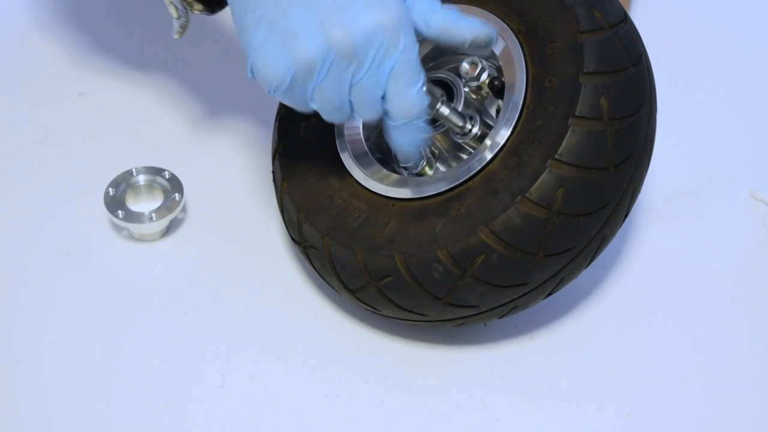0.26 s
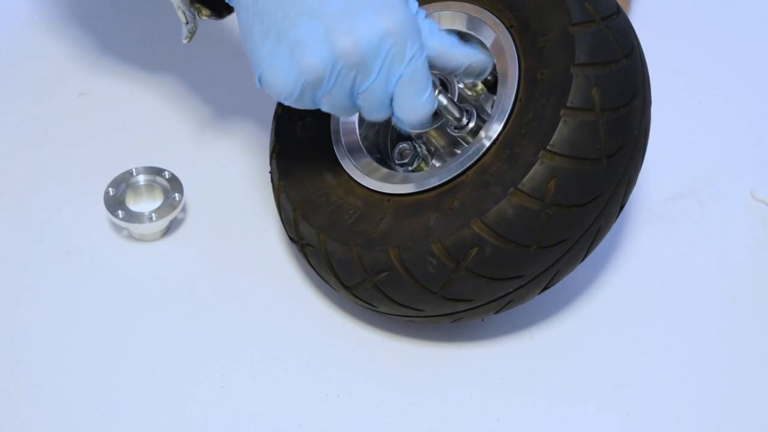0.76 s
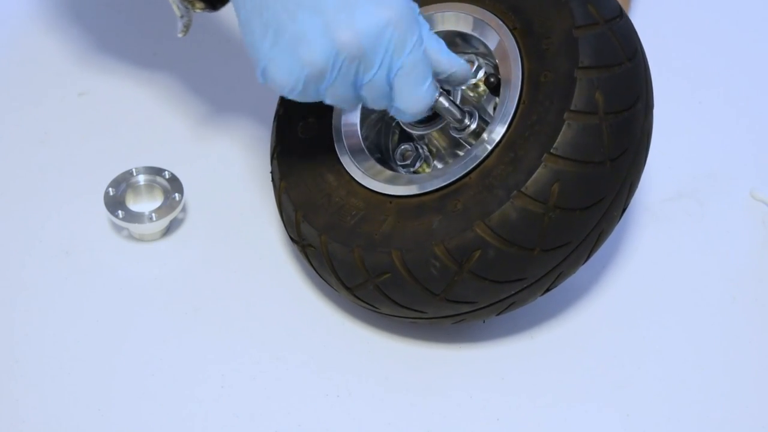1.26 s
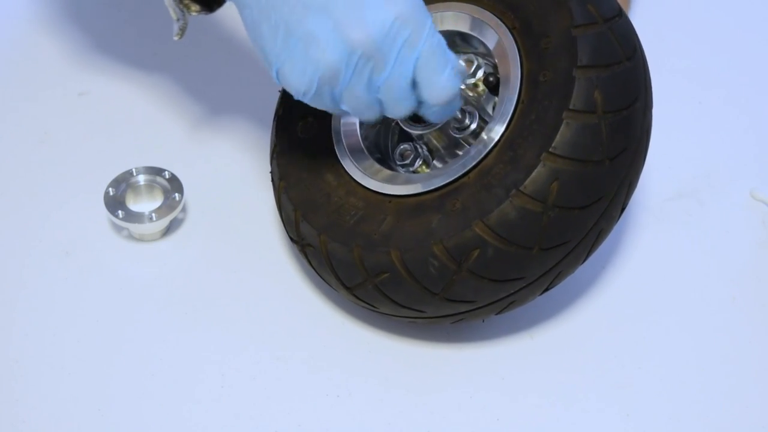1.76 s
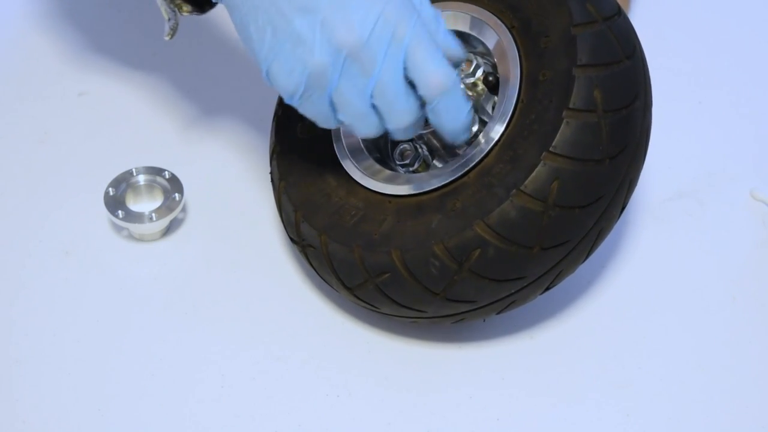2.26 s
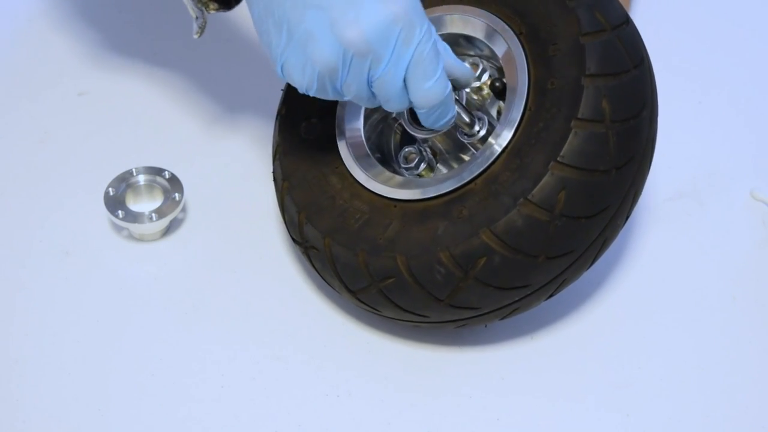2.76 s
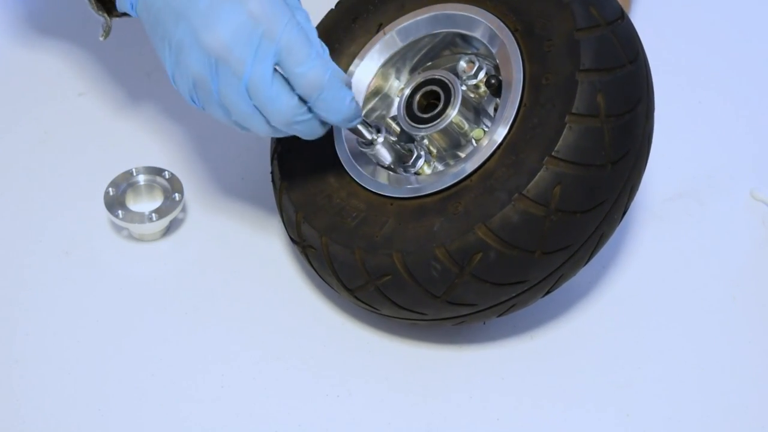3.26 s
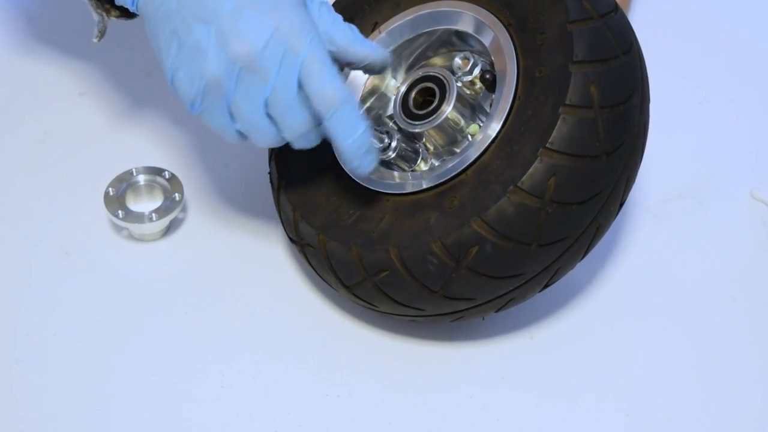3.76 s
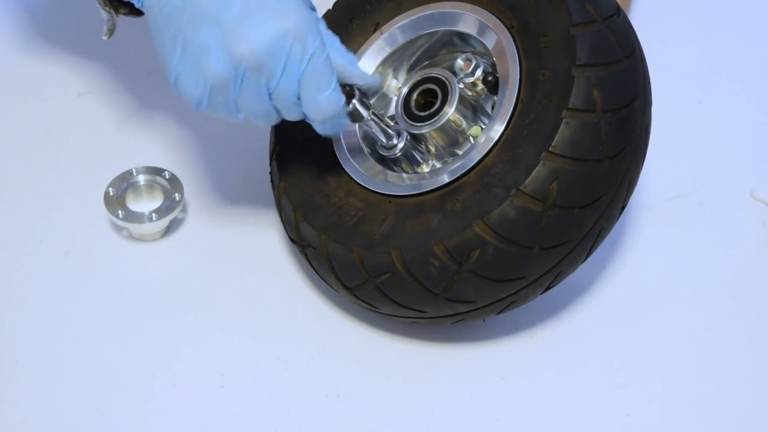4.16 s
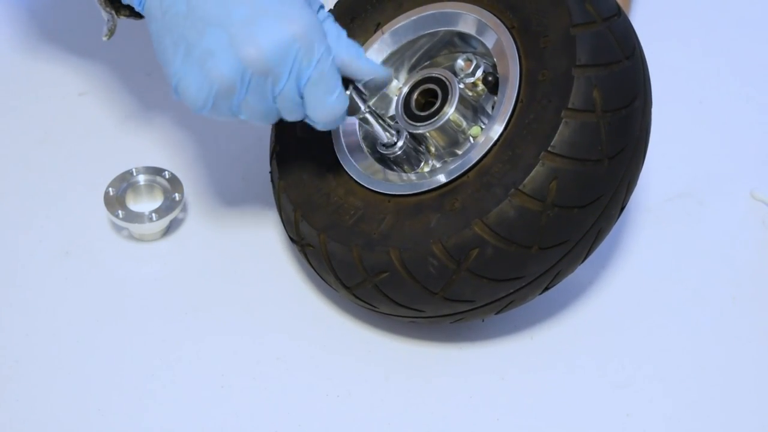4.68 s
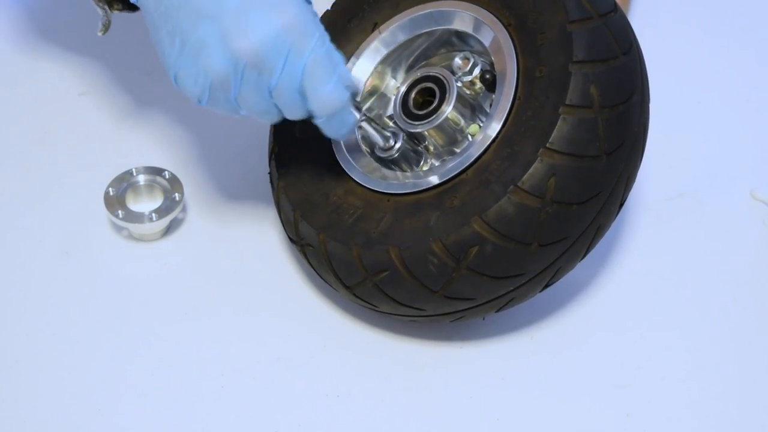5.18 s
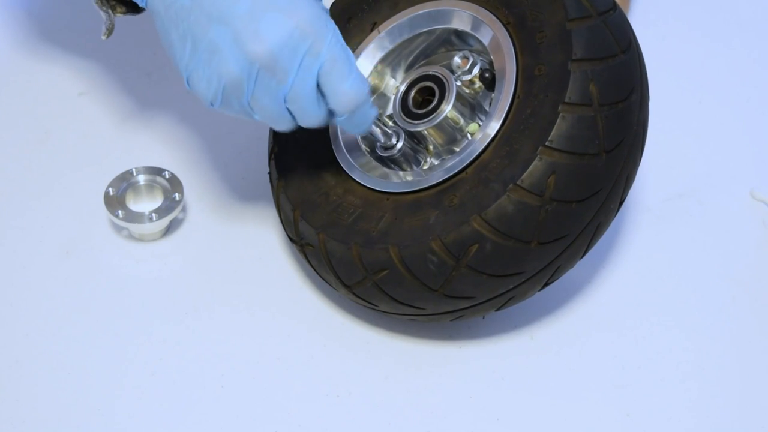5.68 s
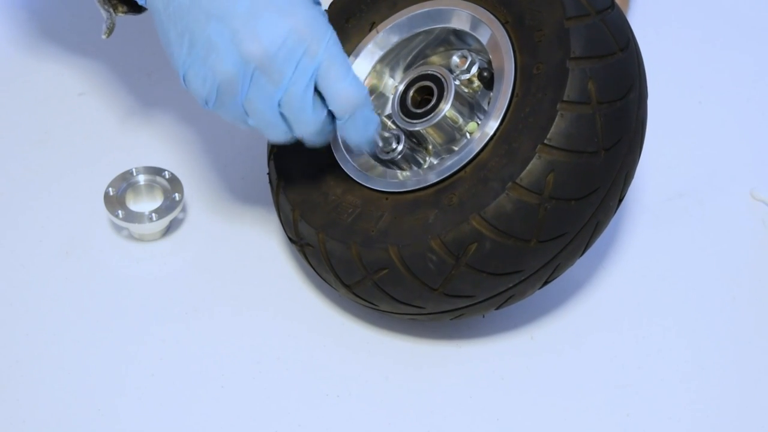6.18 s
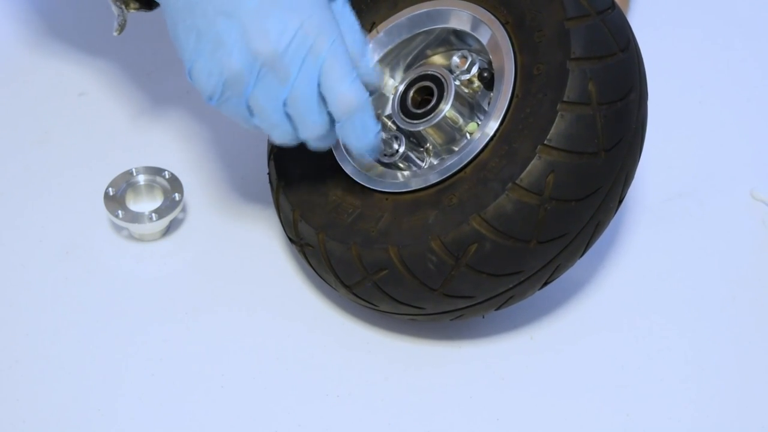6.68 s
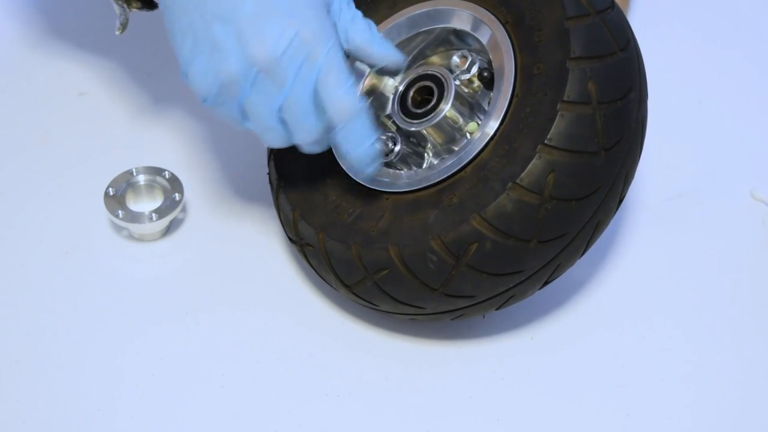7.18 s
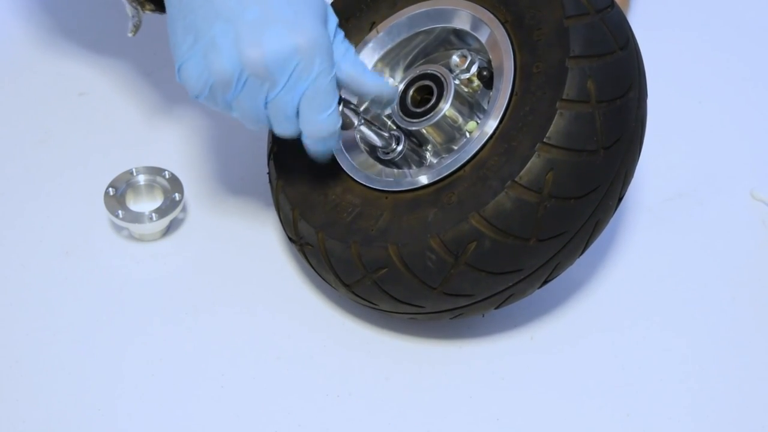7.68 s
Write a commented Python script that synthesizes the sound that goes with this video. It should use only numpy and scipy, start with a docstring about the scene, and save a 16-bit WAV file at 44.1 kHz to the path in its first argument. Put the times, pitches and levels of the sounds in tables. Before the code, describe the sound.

A steady, hollow fan whirr with a very thin whine sits mostly at the right under faint hiss, in a hard room with a short bright reverb. Slightly left and close, a small steel nut is flicked down a stud: light clicks and scratchy thread rattles from 0.1 s, clustering at 0.7 s, 1.3 s and 1.8 s, with dull, quickly damped tyre bumps. The heaviest double bump and knock come near 2.1 s. Clicks continue to 2.7 s, then thin out; a tick at 3.0 s and a sharp bright clack at 3.2-3.3 s mark the change to another nut. From 3.6 s ticks are smaller, with a firmer knock at 4.5 s. From 4.9 s brief dry squeaks join, clearest near 6.0 s, above soft low rumbling. Snappy clicks at 6.3 s, denser knocks from 7.0 s, a thin high ring at 7.26 s, and final knocks near 7.9 s.

```python
"""Under faint hiss and the whirr of a fan inside the camera, filtered noise ringing its case mostly at the right,
a gloved hand spins small steel nuts down the studs of a little alloy wheel on a table in a hard room.
Each finger flick excites damped modes: nut, hub and rim knock, the thread rattles, the tyre bumps the table.
From about 4.9 s the second nut also squeaks on its thread by stick-slip, as the stud resonates."""
import sys
import numpy as np
from scipy import signal
from scipy.fft import rfft, irfft, next_fast_len
from scipy.io import wavfile

SR = 44100
rng = np.random.default_rng(int(sys.argv[2]) if len(sys.argv) > 2 else 0)


def gain_from_db(level_db):
    """Convert decibel levels to linear amplitude factors (20 dB per decade)."""
    decades = np.asarray(level_db, float) / 20
    return 10 ** decades


def int16_out(signal):
    """Quantize to a 16-bit WAV file."""
    q = np.round(np.clip(np.atleast_2d(signal).T, -1, 1) * 32767)
    wavfile.write(sys.argv[1], SR, q.astype(np.int16))


N = 350154
T = np.arange(N) / SR
EARLY_S = .006  # near echoes fill this time, the diffuse tail follows

# broad, well damped resonances of the metal parts: (frequency [Hz], width [Hz], relative level [dB])
RIM_MODES = [(1240, 1800, 7), (2230, 340, 8), (2750, 1660, 6), (3220, 1600, -12)]
HUB_MODES = [(4500, 2500, 3.5), (5130, 330, 2.5), (5840, 1100, 3), (6530, 1060, -3)]
NUT_MODES = [(8200, 2200, 0), (10400, 2200, -1), (12000, 1400, -2), (14000, 2600, -8)]
# pushes of the fingers on the nut: (start [s], held [s], thread rattle level [dB],
# brightness relative to the rattle [dB], tyre creak level [dB])
FINGER_PUSHES = [(0.075, 0.13, -60, -7, -50.5), (0.33, 0.056, -61.5, -9, -56.5),
                 (0.43, 0.015, -52, -9, -46), (0.654, 0.03, -53.5, -7, -52), (0.684, 0.02, -62, -9, -44.5),
                 (0.72, 0.036, -57, -19, -47), (0.84, 0.059, -60, -17, -56),
                 (0.952, 0.074, -59.5, -12, -50), (1.202, 0.063, -56, -6.5, -50),
                 (1.493, 0.09, -57.5, -6, -50), (1.739, 0.091, -50.5, -10, -50.5),
                 (1.85, 0.015, -52, -17, -49.5), (2.051, 0.05, -47.5, -17, -41.5),
                 (2.32, 0.075, -69, -12, -48), (2.458, 0.092, -68, -22, -54.5),
                 (2.551, 0.14, -60, -25, -50), (2.67, 0.017, -71, -25, -56),
                 (3.229, 0.079, -44.5, -49, -48), (3.42, 0.094, -63, -20, -57),
                 (3.599, 0.025, -56.5, -7, -55.5), (3.88, 0.056, -60.5, -14, -53),
                 (4.079, 0.017, -60, -12, -51.5), (4.15, 0.049, -52.5, -10.5, -49),
                 (4.339, .08, -53, -15, -50), (4.447, 0.01, -46, -14, -44.5),
                 (4.55, 0.14, -56.5, -10.5, -51), (4.82, 0.12, -61.5, -14, -52.5),
                 (5.168, 0.055, -46.5, -16, -46.5), (5.433, .01, -49, -5.5, -43.5),
                 (5.444, 0.017, -59, -12, -52), (5.696, 0.15, -51.5, -13.5, -49.5),
                 (5.954, 0.087, -55, -8.5, -51), (6.184, 0.061, -54.5, -12, -49.5),
                 (6.31, 0.016, -52.5, -10, -50.5), (6.46, .1, -53, -10.5, -48.5),
                 (6.639, 0.13, -58, -14, -48.5), (6.779, 0.018, -54.5, -16, -69),
                 (6.953, 0.0036, -50, -15, -56), (6.973, 0.053, -55, -27, -48),
                 (7.088, 0.0079, -48.5, -7, -43), (7.22, 0.076, -48, -12, -48),
                 (7.508, 0.028, -48.5, -13, -50.5), (7.863, .1, -44.5, -18, -45.5)]


def on_log(hz, table):
    """Interpolation on a log frequency axis: reads a (frequency [Hz], value) table."""
    f, v = np.transpose(table)
    return np.interp(np.log(np.maximum(hz, 1)), np.log(f), v)


def colour(x, gain):
    """Linear filtering: multiplies the spectrum by a gain that is a function of Hz."""
    n = next_fast_len(x.shape[-1])
    hz = np.arange(n // 2 + 1) * SR / n
    return irfft(rfft(x, n) * gain(hz), n)[..., :x.shape[-1]]


def resonances(table):
    """Modal superposition: power sum of steep peaks, each 7.5 dB down at the edges of its width."""
    def gain(f):
        peaks = (gain_from_db(db) ** 2 / (1 + (2 * (f - hz) / width) ** 2) ** 2.5 for hz, width, db in table)
        return np.sqrt(sum(peaks))
    return gain


def level(x, db):
    """Mean power: scales a signal to an rms level."""
    return x * gain_from_db(db) / np.sqrt(np.mean(x ** 2))


def peak_one(grains):
    """Normalisation: scales every row to peak 1."""
    return grains / np.abs(grains).max(axis=1, keepdims=True)


def place(times, grains):
    """Superposition in time: adds grains (events x samples) at their starts."""
    out = np.zeros(N + grains.shape[1])
    for s, grain in zip(times, grains):
        i = min(int(s * SR), N)
        out[i:i + len(grain)] += grain
    return out[:N]


def thin_bass(x):
    """High-pass filtering: thins the bass of clicks and pings, 12 dB per octave below 1300 Hz."""
    return colour(x, lambda f: np.clip(f / 1300, 0, 1) ** 2)


def tones(table, attack_s, spread, size):
    """Damped free vibration: clusters of three close modes from rows (s, dB, Hz, t60)."""
    s, db, hz, t60 = np.transpose(table)[:, :, None]
    t = np.arange(size) / SR
    shape = (1 - np.exp(-t / attack_s)) * np.exp(-np.log(1000) * t / t60)
    cluster = sum(np.sin(2 * np.pi * hz * (1 + k * spread) * t) for k in (-1, 0, 1))
    return place(s[:, 0], gain_from_db(db) * peak_one(shape * cluster))


def ticks(per_s, spread_db):
    """Shot noise: random impulses, mostly faint, some stronger; rms 1."""
    chance = rng.random((N, 2))
    excess = np.minimum(-np.log(1 - chance[:, 1]), 4)
    size = gain_from_db(spread_db * excess) * rng.choice([-1, 1], N)
    return level((chance[:, 0] < per_s / SR) * size, 0)


def blows(contact_ms, size=1024):
    """Impact excitation: per row a sharp tick, then grit that swells and dies over the contact time."""
    grit_db = -5
    ms = (np.arange(size) - 88) * 1000 / SR  # the tick falls 2 ms into the row
    grit = gain_from_db(grit_db) * rng.standard_normal((len(contact_ms), size))
    swell = np.clip(ms / contact_ms[:, None], 0, 1)
    decay = np.exp(-np.maximum(ms, 0) / np.clip(contact_ms, .1, 6)[:, None])
    return (ms == 0) + grit * swell * decay


def pushes(rows, db, fall_db_per_s, rest_db):
    """Friction under load: level in dB that swells with each push, holds, and dies to its resting level."""
    rise_s = 0.00066
    power = gain_from_db(rest_db) ** 2
    for (s, held_s, *_), peak_db in zip(rows, db):
        rise = np.clip((T - s) / rise_s, 0, 1)
        fall_db = fall_db_per_s * np.maximum(T - s - held_s, 0)
        power = power + (rise * gain_from_db(peak_db - fall_db)) ** 2
    return 10 * np.log10(power)


def air():
    """Broadband noise: faint hiss of room and microphones, its bass coherent on both sides."""
    # hiss spectrum: (frequency [Hz], relative density [dB])
    hiss_spectrum = [(25, 27.5), (60, 12), (120, -6), (300, -10.5), (1000, 4), (3000, -5.5), (5000, -9.5),
                     (8000, -16.5), (12000, -21), (16000, -33)]
    shared, left, right = rng.standard_normal((3, N))
    apart = colour(np.array([left, right]), lambda f: np.clip(f / 300, 0, 2))
    return level(colour(shared + apart, lambda f: gain_from_db(on_log(f, hiss_spectrum))), -51.5)


def camera_fan():
    """Forced resonance: air rush rings the camera case, and the motor adds one thin tone at the right."""
    # case resonances heard at each microphone: (frequency [Hz], width [Hz], relative level [dB])
    case_right = [(250, 48, -21), (568, 66, -7), (655, 340, -9), (986.6, 83, 4.5), (1180, 110, 5),
                  (1309, 106, 1.5), (1510, 600, -7.5), (1734, 152, 2.5), (1657, 26, 2), (1942, 113, -3.5),
                  (2513, 200, -10.5), (3005, 58, -21)]
    case_left = [(490, 490, -5), (920, 200, -23.5), (976, 220, 12.5), (1130, 250, -7), (1645, 190, 9),
                 (2180, 200, 4), (2080, 100, -24), (3060, 180, 2)]
    right_db, left_db, likeness = -38, -51.5, 0.59
    whine_hz, whine_db = 2136, -63
    rush, other = rng.standard_normal((2, N))
    left_rush = likeness * rush + np.sqrt(1 - likeness ** 2) * other
    left = level(colour(left_rush, resonances(case_left)), left_db)
    right = level(colour(rush, resonances(case_right)), right_db)
    whine = np.sqrt(2) * gain_from_db(whine_db) * np.sin(2 * np.pi * whine_hz * T)
    return np.array([left, right + whine])


def room():
    """Diffuse reverberation: a two-sided noise tail whose bands decay exponentially, each at its own rate."""
    # reverberation time: (frequency [Hz], t60 [s])
    reverberation = [(200, 0.088), (1000, 0.21), (3000, 0.36), (6000, 0.37), (12000, 0.29), (16000, 0.17)]
    # coherence: (frequency [Hz], share of power common to both sides [0 to 1])
    coherence = [(100, 0.91), (500, 0.52), (2500, 0.97), (6000, 0.87), (12000, 0.29)]
    room_db = 1
    t = np.arange(SR // 2) / SR
    shared, left, right = rng.standard_normal((3, len(t)))
    tail = 0
    for hz in 100 * 2 ** np.arange(0, 8, .5):
        like = on_log(hz, coherence)
        noise = np.sqrt(like) * shared + np.sqrt(1 - like) * np.array([left, right])
        # triangular band, half an octave to either side
        band = colour(noise, lambda f: np.clip(1 - 2 * np.abs(np.log2(np.maximum(f, 1) / hz)), 0, 1))
        tail = tail + band * (t >= EARLY_S) * np.exp(-np.log(1000) * t / on_log(hz, reverberation))
    return gain_from_db(room_db) * tail / np.sqrt(np.sum(tail ** 2) / 2)


def blended_room(x):
    """Diffuse reverberation: a smooth tail blended in turn from four random responses."""
    step_s = .23
    turn = T / step_s
    wet = 0
    for k in range(4):
        share = np.clip(1 - np.abs((turn - k + 2) % 4 - 2), 0, 1)
        wet = wet + signal.oaconvolve((np.sqrt(share) * x)[None], room(), axes=1)[:, :N]
    return wet


def table_rumble():
    """Low resonance under load: the table rumbles as the hand leans on the wheel, harder for the second nut."""
    # lean of the hand: (time [s], rumble level [dB])
    lean = [(0, -71), (0.7, -77), (1.3, -72), (1.9, -85), (2.5, -69), (3.0, -80), (3.4, -71), (4.4, -65),
            (5.1, -66.5), (5.8, -62.5), (6.7, -67), (7.5, -65.5), (7.94, -80)]
    grumble = colour(ticks(per_s=160, spread_db=4), resonances([(144, 350, 0)]))
    return gain_from_db(np.interp(T, *np.transpose(lean))) * level(grumble, 0)


def wheel_rocks():
    """Rigid-body rocking: the wheel rocks on the table in low damped modes."""
    # rocks: (time [s], peak level [dB], middle pitch [Hz])
    rock_rows = [(1.14, -55, 175), (2.049, -53, 242), (2.096, -40, 304), (2.139, -47, 274),
                 (3.232, -46, 143), (3.785, -50, 142), (4.297, -42, 130), (4.456, -54, 154),
                 (4.548, -46, 165), (4.764, -49, 117), (5.054, -47, 185), (5.173, -49, 163),
                 (5.586, -45, 138), (5.708, -47, 177), (6.317, -52, 168), (6.648, -47, 150),
                 (7.187, -47.5, 131), (7.388, -48, 135), (7.49, -52, 177)]
    return tones([(*row, .05) for row in rock_rows], attack_s=0.0022, spread=0.17, size=9000)


def tyre_bumps():
    """Heavily damped impact: the tyre bumps the table and its widely spaced modes die in 30 ms."""
    # bumps: (time [s], peak level [dB], middle pitch [Hz])
    bump_rows = [(0.445, -39.5, 543), (0.663, -35, 690), (0.727, -30, 567), (0.844, -37, 390),
                 (1.141, -37, 533), (1.216, -31.5, 510), (1.538, -35, 545), (1.581, -32, 540),
                 (1.734, -36, 544), (1.857, -33, 500), (2.059, -32, 460), (2.097, -24.5, 505),
                 (2.104, -24, 410), (2.118, -33, 320), (2.131, -30, 500), (2.162, -34, 560),
                 (2.325, -35, 545), (2.352, -32, 483), (2.561, -31, 550), (2.591, -33, 634),
                 (4.17, -45, 426), (4.458, -32, 540), (4.536, -38, 514), (5.175, -35, 560),
                 (5.714, -38, 500), (5.971, -39.5, 537), (6.323, -33, 640), (6.686, -55, 516),
                 (6.974, -32.5, 540), (7.19, -34, 486), (7.36, -31, 505), (7.615, -38.5, 504),
                 (7.87, -35, 615)]
    return tones([(*row, .03) for row in bump_rows], attack_s=.002, spread=.14, size=4000)


def tyre_creak():
    """Friction noise: rubber creaks through the tyre's resonances under each push."""
    # tyre resonances: (frequency [Hz], width [Hz], relative level [dB])
    tyre_modes = [(340, 280, -9.5), (496.4, 157, 5.5), (741, 275, 2.5), (1400, 1140, -4)]
    creak_db = np.transpose(FINGER_PUSHES)[4]
    swell_db = pushes(FINGER_PUSHES, creak_db, fall_db_per_s=96, rest_db=-63)
    return gain_from_db(swell_db) * level(colour(ticks(per_s=900, spread_db=3.2), resonances(tyre_modes)), 0)


def squeaks():
    """Stick-slip: fast slips of the second nut on its thread ring the stud."""
    # squeaks: (start [s], held [s], level [dB])
    squeak_rows = [(4.92, 0.03, -60), (6.015, 0.016, -44), (6.279, 0.03, -57), (6.5, 0.023, -53),
                   (6.79, 0.03, -55), (7.062, 0.05, -50), (7.27, 0.031, -55), (7.57, 0.021, -49)]
    # stud resonance: (frequency [Hz], width [Hz], relative level [dB])
    stud_mode = [(5030, 380, 0)]
    db = pushes(squeak_rows, np.transpose(squeak_rows)[2], fall_db_per_s=400, rest_db=-95)
    return gain_from_db(db) * level(colour(ticks(per_s=720, spread_db=2.0), resonances(stud_mode)), 0)


def taps(rattle_db, count):
    """Random impacts: faint taps as strong as the thread rattles just then; rows like the knocks."""
    over_rattle_db, spread_db = 12, 4
    shares_db = (-14.5, -14, -20)  # rim, hub, nut
    s = rng.random(count) * N / SR
    chance = spread_db * rng.standard_normal((count, 4))
    tap_db = np.interp(s, T, rattle_db) + over_rattle_db + chance[:, 0]
    return np.column_stack([s + 0.0018, tap_db, shares_db + chance[:, 1:]])


def thread_rattle():
    """Chatter in a clearance: thread play rings the metal under each push; also returns faint tap rows."""
    fall_db_per_s = 159
    rest_db, rest_bright_db = -88, -29  # fingers resting on the nut
    _, _, rattle_db, bright_db, _ = np.transpose(FINGER_PUSHES)
    dull_db = pushes(FINGER_PUSHES, rattle_db, fall_db_per_s, rest_db)
    sharp_db = pushes(FINGER_PUSHES, rattle_db + bright_db, fall_db_per_s, rest_db + rest_bright_db)
    chatter = ticks(per_s=1300, spread_db=4)
    dull = gain_from_db(dull_db) * level(colour(chatter, resonances(RIM_MODES + HUB_MODES)), 0)
    sharp = gain_from_db(sharp_db) * level(colour(chatter, resonances(NUT_MODES)), 0)
    return dull + sharp, taps(dull_db, count=45)


def metal_pings():
    """Damped modes: short pitched colour of the knocks, and a few longer nut rings."""
    # pings: (time [s], peak level before the bass loss [dB], middle pitch [Hz], t60 [s])
    ping_rows = [(0.7035, -18.5, 3050, 0.004), (0.739, -32, 2670, 0.004), (1.787, -16.5, 2680, 0.0037),
                 (1.858, -30.5, 5260, 0.008), (1.862, -32, 6200, 0.008), (1.876, -31, 5600, 0.012),
                 (2.454, -40, 13700, .012), (2.454, -41, 8800, .01), (3.005, -29, 5700, 0.0074),
                 (3.0052, -24.5, 6170, 0.0041), (3.005, -36, 13300, 0.0054), (3.231, -20, 5700, 0.0089),
                 (3.2315, -17, 4330, .005), (3.232, -17.5, 3180, .005), (3.231, -50, 14300, .04),
                 (3.231, -51, 10800, .02), (3.425, -35, 5130, 0.011), (4.147, -40.5, 8500, 0.0091),
                 (5.78, -31, 5100, .008), (5.968, -34.5, 11800, .03), (6.02, -35, 12070, .02),
                 (7.255, -24, 10800, 0.004), (7.272, -33, 10600, .005), (7.257, -25, 11900, 0.19),
                 (7.2575, -26, 5400, 0.01), (7.2548, -20.5, 2750, 0.0045), (7.2575, -29, 2270, 0.0066)]
    return thin_bass(tones(ping_rows, attack_s=.0005, spread=.004, size=9000))


def snaps():
    """Short contact, wide spectrum: some knocks also snap in the top treble."""
    # snaps: (time [s], peak level [dB])
    snap_rows = [(3.3334, -48), (3.3388, -31), (3.481, -42), (6.32, -20), (6.3244, -30), (6.7101, -49),
                 (7.0933, -38), (7.5128, -39)]
    # treble band: (frequency [Hz], width [Hz], relative level [dB])
    snap_band = [(14300, 5000, 0)]
    contact_ms = .7
    s, db = np.transpose(snap_rows)
    bursts = colour(blows(np.full(len(s), contact_ms)), resonances(snap_band))
    return place(s - .002, gain_from_db(db)[:, None] * peak_one(bursts))


def ring_parts(contact, shares):
    """Modal excitation: one blow sounds through rim, hub and nut, each in its own share."""
    parts = 0
    for modes, share_db in zip((RIM_MODES, HUB_MODES, NUT_MODES), shares):
        parts = parts + gain_from_db(share_db)[:, None] * peak_one(colour(contact, resonances(modes)))
    return thin_bass(parts)


def near_echoes(s, clicks):
    """Early reflections: table, tyre, rim and hand throw each click back at once, in a new random pattern."""
    early_db, likeness = 4, 0.81  # likeness: share of power common to both sides
    table_echo_s, table_echo_db = .0046, -11.5  # one distinct reflection
    size = int(EARLY_S * SR)
    shared, left, right = rng.standard_normal((3, len(s), size)) / np.sqrt(size)
    table_echo = np.eye(1, size, int(table_echo_s * SR)) * gain_from_db(table_echo_db)
    near = []
    for own in (left, right):
        echo = gain_from_db(early_db) * (np.sqrt(likeness) * shared + np.sqrt(1 - likeness) * own)
        near.append(place(s - .002, signal.fftconvolve(clicks, echo + table_echo, axes=1)))
    return np.array(near)


def knocks(faint):
    """Impact of nut on stud and hub: returns the clicks, smooth clicks for the reverb, and near echoes."""
    # clear knocks: (time [s], peak level [dB], rim share [dB], hub share [dB], nut share [dB]);
    # the shares count only relative to one another
    knock_rows = [(0.0758, -33, -11.5, -23, -13), (0.1652, -29, -9, -20, -12.5),
                  (0.2032, -30, -9.5, -13, -15), (0.3324, -37, -10, -16, -10), (0.377, -36, 31, -29, -15),
                  (0.4412, -24, 0, -20, -10.5), (0.6719, -37, -4, -17, -27), (0.685, -28.5, -9, -8, 1),
                  (0.704, -19, -8, -8, -38), (0.731, -21, -15, -22, -2), (0.7395, -19.5, -7, -16, -35),
                  (0.767, -31, -19, -4, -13), (0.9687, -39, -3, -19, -4), (0.9905, -34, 9, -14, -19),
                  (1.007, -25, 0, -9, -7), (1.2096, -31.5, -6, -15, -4), (1.2581, -25.5, 6, -21, -9),
                  (1.277, -15, -8.5, -22, -23.5), (1.3468, -26.5, 1, -14, -24),
                  (1.504, -26.5, -3, -12, -19), (1.5441, -24.5, 1, -20, -13),
                  (1.5644, -25.5, -9.5, -16, -9), (1.732, -19, 11, -14, -4), (1.7651, -28, -15, -19, -15),
                  (1.787, -22, -6, -30, -27), (1.8555, -18, -8, -12, -12), (1.9734, -37.5, -20, -10, -19),
                  (2.0563, -22, -13, -11, -8.5), (2.0998, -18.5, -8.5, -12.5, -8),
                  (2.2226, -31.5, 7, -31, -23), (2.3265, -30, 6, -34, -37), (2.4, -38, -10, -24, -7),
                  (2.4545, -19, -4, -12, -24.5), (2.549, -27, -3, -18, -27), (2.588, -30.5, 8, -28, -36),
                  (2.6354, -31.5, 4, -18, -10), (2.672, -32, 6, -25, -18), (2.679, -26, 1, -15, -20),
                  (2.685, -33, 1, -9, -20), (2.955, -38, -5, -8, -31), (3.005, -19, -20, -20, -28),
                  (3.2316, -18, -7, 0, -22), (3.2345, -19, -10, -4, -28), (3.253, -27, -10, -4, -32),
                  (3.29, -28, -8, -4, -32), (3.3347, -20.5, -14.5, -13, -9), (3.4251, -31, -12, -11, -14),
                  (3.441, -32, -13, -14, -12), (3.4823, -28, -8, -15, -11.5), (3.61, -35.5, -4, -4, -6),
                  (3.6304, -33, -17, -9, -8), (3.8784, -33, 1, -3, 2), (4.063, -36, -2.5, -11, -12),
                  (4.146, -38.5, -32, -11, -21), (4.2567, -33, 1, -9, -3), (4.3538, -35.5, -10, -19, -13.5),
                  (4.3813, -35, -17, -12, -18), (4.459, -20.5, -16, -15, -14), (4.5501, -25, -25, -20, -7),
                  (4.6354, -27, -14, -11, -19), (4.672, -32.5, -11.5, -3, -11), (4.795, -37, -7, -12, -11),
                  (4.821, -37, -10, -13, -13), (4.886, -34.5, 1, -4, -12), (4.917, -39, -16, -8, -14.5),
                  (5.009, -33.5, -10, -16, -21), (5.045, -35.5, -11, -2, -4),
                  (5.167, -24.5, -8.5, -8, -11.5), (5.171, -28, -15, -10, 13), (5.175, -27.5, -7, -4, -2),
                  (5.2794, -31.5, 9, -14, -14), (5.2954, -31, -29, -3, -8), (5.446, -28, -36, -11, -9),
                  (5.5895, -33.5, -7, -14, -16.5), (5.7095, -24.5, -8.5, -7, -12.5),
                  (5.736, -47, -20, -22, -8), (5.77, -26, -6, -8, -12), (5.7803, -27, -7, -2, -1),
                  (5.815, -32, -14, -10, -6), (5.86, -41, -14, -13, -4), (5.89, -36, -26, -16, -9),
                  (5.9683, -28.5, -18, -4, -8), (6.022, -26, -11, -12, -16), (6.037, -29, -12, -5, -17),
                  (6.045, -32, -14, -8, -17), (6.151, -37.5, -8, -18, -9), (6.198, -42, -14, -10, 1),
                  (6.2255, -32.5, -15, -14, -13), (6.295, -30, -9, -2, -8), (6.321, -22, -11.5, -17, -11),
                  (6.3255, -29.5, -10, -16, -5), (6.334, -29, -16, -12, -6), (6.4316, -36, -14, -9, -12),
                  (6.4978, -38, -16, 0, -13), (6.642, -32, 5.5, -14, -2), (6.688, -44, -12, -10, -12),
                  (6.7099, -34.5, -18, -8, -11), (6.735, -33.5, -6, -6, -19),
                  (6.797, -32.5, -15, -6, -16.5), (6.815, -34, -12, -9, -12), (6.875, -46, -6, -12, -12),
                  (6.975, -24.5, -8, -19, -16), (7.003, -28, -7, -29, -20), (7.0626, -24, -7, -10, -22),
                  (7.0936, -21, -11, -10, -9), (7.11, -28, -14, -10, -14), (7.2265, -25.5, 2, -9, -3),
                  (7.2548, -21, -17.5, -14, -19), (7.2578, -20, -1.5, -13, -9.5),
                  (7.3818, -31, 3, -19, -11), (7.4826, -34, 1, 0, -1), (7.5148, -20.5, -12.5, -23, -13.5),
                  (7.5797, -24.5, -16, -14, -19.5), (7.6126, -28.5, -3.5, -34, -4.5),
                  (7.829, -40, -6, -1, -5), (7.871, -19, -13, -17.5, -14), (7.927, -19.5, -18, -7, -8)]
    s, db, *shares = np.transpose([*knock_rows, *faint])
    # the more the rim outweighs the nut, the shorter the contact
    contact_ms = 1.14 * gain_from_db(np.minimum(shares[2] - shares[0], 0))
    contact = blows(contact_ms)
    clicks = gain_from_db(db)[:, None] * peak_one(ring_parts(contact, shares))
    # the reverb is fed a smooth click, free of grit, of equal energy
    impulses = np.eye(1, contact.shape[1], 88).repeat(len(s), axis=0)
    smooth = ring_parts(impulses, shares)
    smooth = smooth * np.sqrt(np.sum(clicks ** 2, axis=1) / np.sum(smooth ** 2, axis=1))[:, None]
    return place(s - .002, clicks), place(s - .002, smooth), near_echoes(s, clicks)


def scene():
    """Superposition of direct and reverberant sound: the wheel, a little to the left, over fan and air."""
    # side balance: (frequency [Hz], left minus right [dB])
    left_lead = [(100, -2), (500, 2), (1500, 10), (2800, 5.5), (5500, 4), (10000, 5.5), (15000, 0.5)]
    ping_room_db, bump_room_db = -5, -5  # pings and bumps sound drier than the knocks
    rattle, faint = thread_rattle()
    clicks, smooth, near = knocks(faint)
    pings = metal_pings()
    bumps = tyre_bumps() + squeaks()
    wheel = wheel_rocks() + rattle + tyre_creak() + table_rumble() + snaps()
    to_room = smooth + gain_from_db(bump_room_db) * bumps + gain_from_db(ping_room_db) * pings + wheel
    wet = near + clicks + pings + bumps + wheel + blended_room(to_room)
    heard = [colour(x, lambda f: gain_from_db(side * on_log(f, left_lead) / 2)) for x, side in zip(wet, (1, -1))]
    return np.array(heard) + camera_fan() + air()


def roll_off(x):
    """The treble ends steeply here."""
    return signal.sosfilt(signal.butter(12, 16510, fs=SR, output="sos"), x)


def record(dry):
    """Band limiting: a steep top cut at 16050 Hz and a bass cut at 134 Hz."""
    top_cut = signal.ellip(8, .2, 60, 16050, fs=SR, output="sos")
    bass_cut = signal.butter(3, 134, "high", fs=SR, output="sos")
    mix = signal.sosfilt(bass_cut, signal.sosfilt(top_cut, dry))
    return roll_off(mix)


dry = scene()
out = record(dry)
int16_out(out)
```